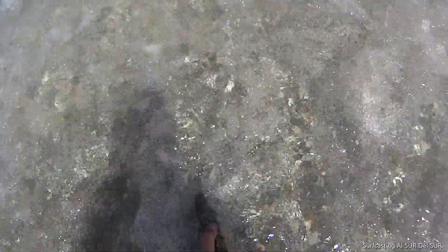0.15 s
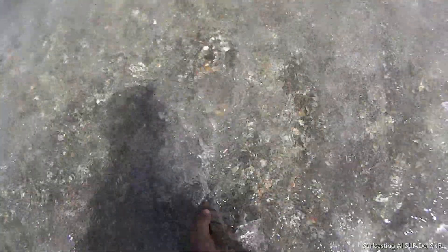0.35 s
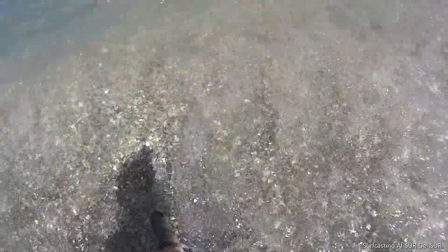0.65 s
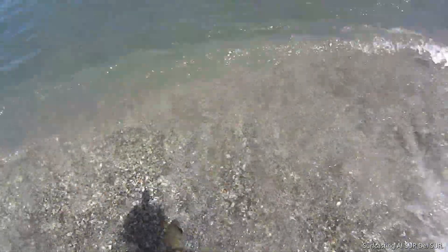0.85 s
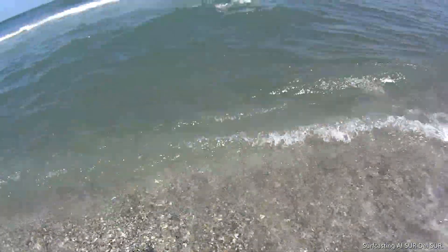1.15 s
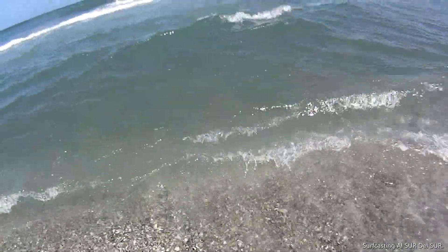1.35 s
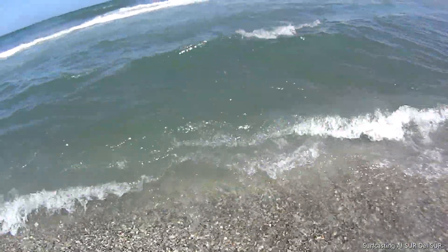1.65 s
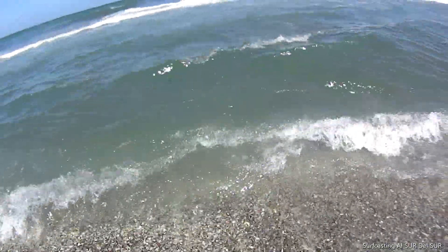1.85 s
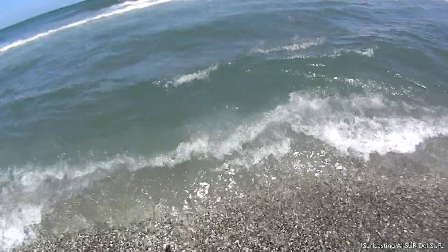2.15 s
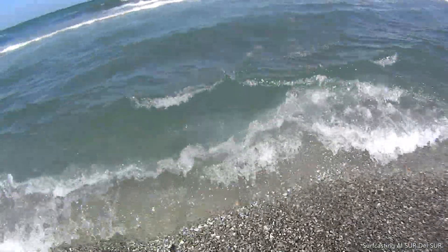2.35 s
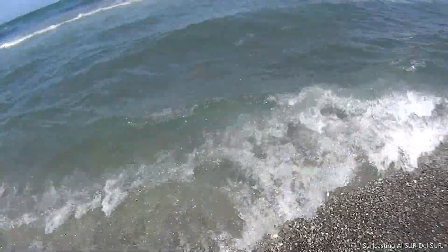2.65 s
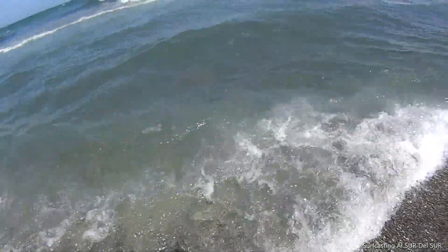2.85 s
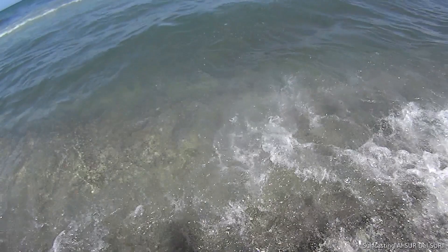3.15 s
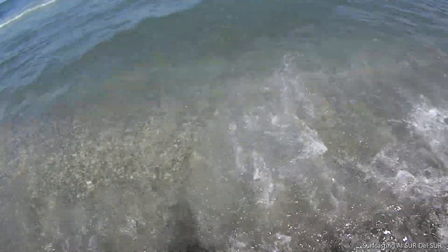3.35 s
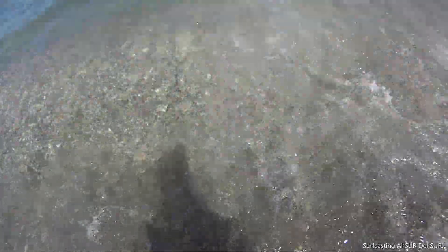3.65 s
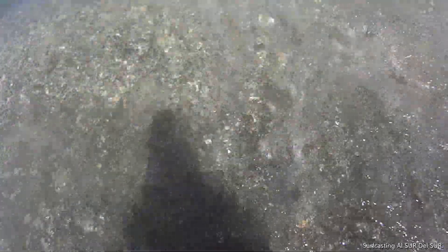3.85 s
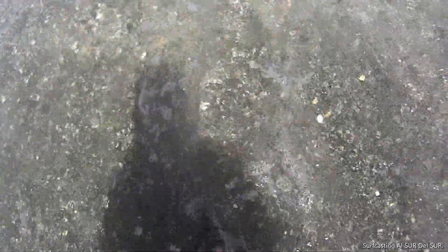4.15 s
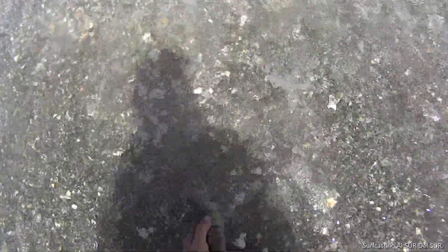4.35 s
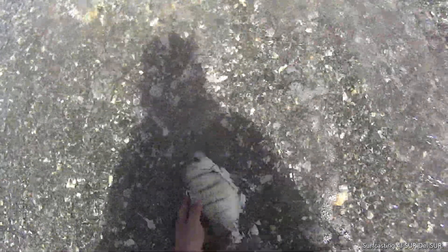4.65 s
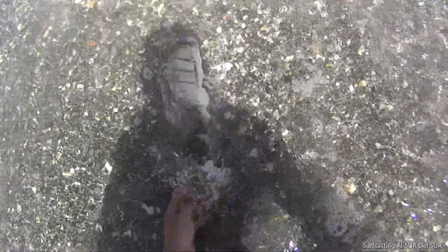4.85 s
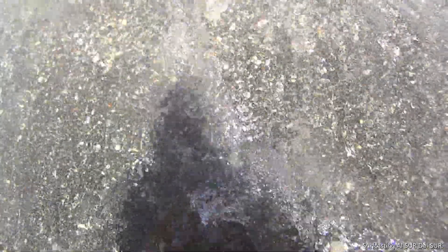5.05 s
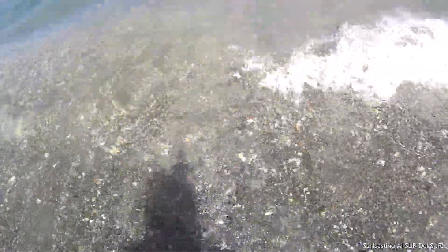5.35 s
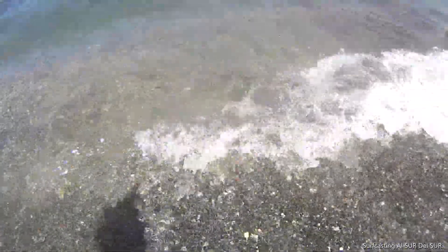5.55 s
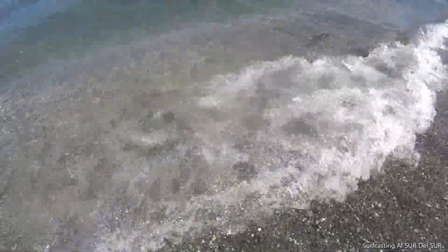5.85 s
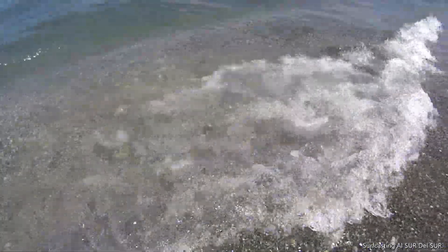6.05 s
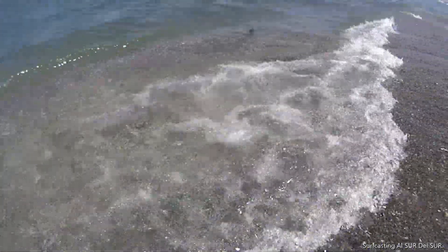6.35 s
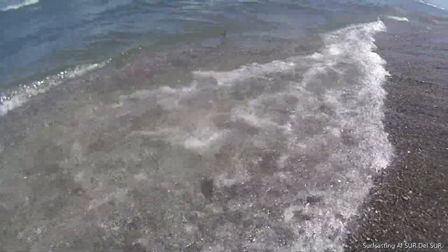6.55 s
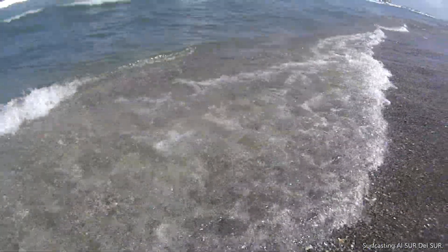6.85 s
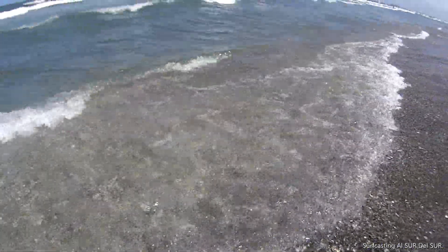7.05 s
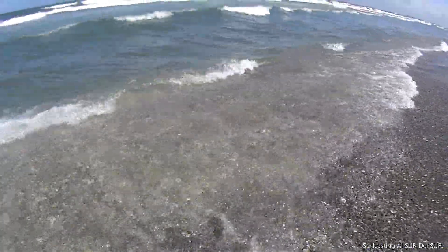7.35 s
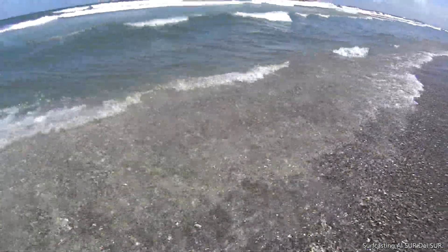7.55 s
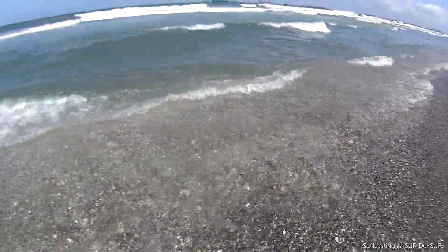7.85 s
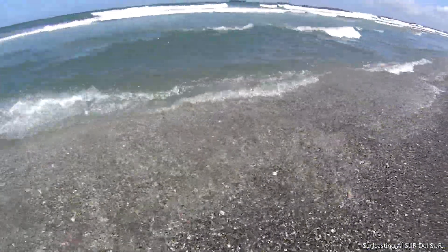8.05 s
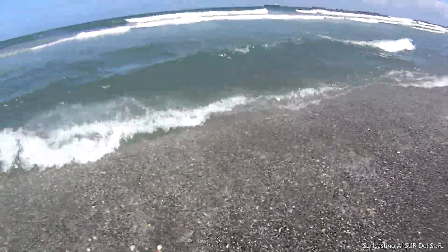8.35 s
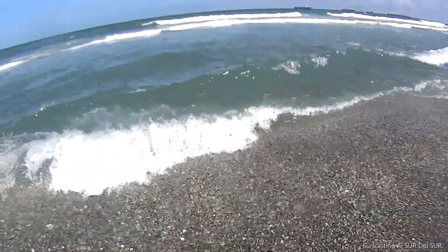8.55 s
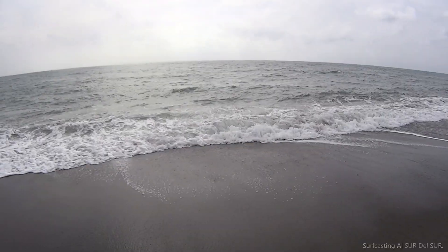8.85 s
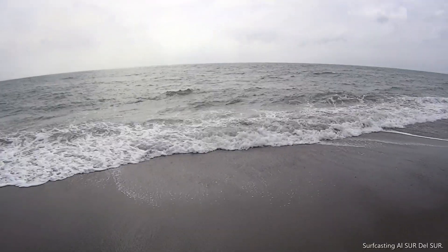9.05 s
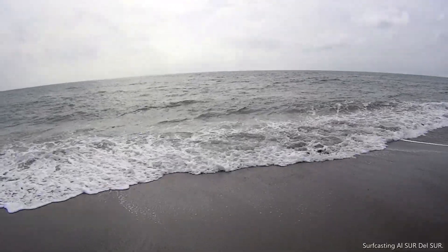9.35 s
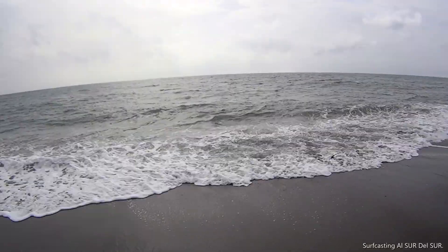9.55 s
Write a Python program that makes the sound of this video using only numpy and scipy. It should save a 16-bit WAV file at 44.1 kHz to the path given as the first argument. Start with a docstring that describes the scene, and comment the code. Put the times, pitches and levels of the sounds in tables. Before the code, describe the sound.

Close outdoor surf on pebbles, coloured by the hollow, nasal ring of a waterproof microphone case. At 0 s churning water is already draining, with a small slap and ping near 0.5 s. A wave builds from about 0.5 to 1.5 s, then a stronger breaker surges at 2.3-3 s, bright with rushing bubbles and foam, and drops away quickly. The water is calmer until 3.8 s, when close splashing starts: sharp wet slaps, droplets and tiny bubble pings, clustered again at 4.7-5.1 s. Another wave washes up around 5.3-5.9 s and the next drains slowly, with soft low plops or case knocks at 6-7 s. Further waves swell at 7.5 and 8.3 s. Deep gusts buffet faintly. Near 8.84 s everything fades out momentarily, then much softer, hollower surf on sand returns and ebbs to the end.

```python
"""Small waves break and wash up a pebble beach, heard from inside a hollow waterproof case.
From the start each wave builds, runs up and drains away: noise and ringing bubbles, split into bands.
Short slaps and bright pings add splashes close by, most of them from about 3.8 to 5.1 s; low plops or
knocks on the case, made as short fading tones, come mostly from 6 to 7 s. Gusts swell the deep bass.
Near 8.84 s the sound fades out for an instant and returns as softer, hollower surf on sand.
"""
import sys
import numpy as np
from scipy import signal
from scipy.fft import rfft, irfft
from scipy.io import wavfile

SR = 44100
rng = np.random.default_rng(int(sys.argv[2]) if len(sys.argv) > 2 else 0)


def transcribe(u):
    """Save the signal u as a 16-bit wav file named by the first command-line argument.

    u: samples, shape (n,) or (channels, n), limited to [-1, 1]; the rate is SR.
    q: integer samples, one column per channel.
    """
    v = np.clip(np.atleast_2d(u).T, -1, 1)
    q = np.round(v * 32767).astype(np.int16)
    wavfile.write(sys.argv[1], SR, q)


N = 428642  # length in samples
T = np.arange(N) / SR  # time of each sample, s
HZ = np.fft.rfftfreq(N, 1 / SR)  # pitch of each step of a spectrum


# the side from which the rush and fizz come: (time [s], left minus right [dB])
RUSH_SIDE = [(0.2, -0.5), (.75, 0.5), (2.2, 1), (2.75, 0.1), (3.25, -2.1), (3.75, -.3), (4.25, -1.4),
             (4.75, -.6), (5.25, -1.2), (6.3, 0.7), (8.8, 1), (8.9, -1)]


def surf():
    """Moving water sounds in bands, from deep slosh to fizzing foam, each with its own changing level."""
    (slosh_db, churn_db, rush_db, fizz_db), spray = shore()
    buffet_db, rumble_db = wind()
    water = through_case(water_source(spray))

    slosh = voiced(water, 150, 790) * gain_of(slosh_db + 0.84 * drift(12))
    # a big breaker traps big pockets of air, so it swells most in the bass
    surge_db = np.maximum(slosh_db - np.median(slosh_db), 0)
    boom_noise = through_case(rng.standard_normal((2, N)))
    boom = voiced(boom_noise, 200, 400) * gain_of(slosh_db - 3) * (1 - gain_of(-2 * surge_db))
    churn = voiced(water, 870, 1864) * gain_of(churn_db + 0.64 * drift(20))

    # water tumbles in clumps, the more so the closer it splashes
    clumps_db = (0.26 + 1.5 * spray) * drift(35)
    rush = voiced(water, 2260, 5780) * gain_of(rush_db + clumps_db)
    foam = water * band(6600, 20000)
    fizz = voiced(foam, 6900, 10100) * gain_of(fizz_db + clumps_db + 0.48 * drift(25))

    buffet = voiced(water, 12, 33) * gain_of(buffet_db + 1.5 * drift(5))
    rumble = voiced(water, 54, 134) * gain_of(rumble_db + 1.0 * drift(6.2))

    side_db, = follow(RUSH_SIDE)
    left_right = gain_of([side_db / 2, -side_db / 2])
    return slosh + boom + churn + buffet + rumble + (rush + fizz) * left_right


# each wave builds, runs up the shingle and drains away: (start [s], rise [s], hold [s],
# fall before FALL_RATIO [dB per s], slosh of the water mass [dB], churning water [dB],
# rush of bubbles and stones [dB], fizz of foam [dB])
WAVES = [(-.42, .25, 0.5, 11.5, -53, -38.5, -33.5, -45), (0.427, 1.08, .86, 5.5, -51.5, -44.5, -30, -40.5),
         (2.244, 0.38, 0.32, 22, -48.5, -36, -25.5, -33),
         (2.763, 0.082, 0.018, 78.5, -56, -33.5, -26.5, -38), (4.94, 0.37, 0.56, 31, -51, -43, -30, -40),
         (5.96, 0.14, 0.62, 4.7, -53.5, -40, -28.5, -38.5), (7.18, 0.55, 0.31, 17, -65, -42.5, -32, -41.5),
         (8.02, 0.38, 0.33, 24, -51.5, -43.5, -26.5, -33.3), (8.6, 0.14, .05, 20, -52, -48, -28.5, -38)]
# bouts of splashing in the shallows close by:
# (start [s], hold after the rise [s], slosh [dB], churn [dB], rush [dB], fizz [dB])
SPLASHING = [(.48, .04, -60, -45, -41, -43), (3.876, 0.36, -54.5, -39, -33, -40),
             (4.097, 0.044, -52, -42, -34, -44), (4.78, 0.32, -53, -38, -32.5, -41.5)]
# the sea between waves: (slosh [dB], churn [dB], rush [dB], fizz [dB])
SEA_DB = (-53, -41.5, -40.5, -50)
# a wave running out on sand: (time [s], slosh [dB], churn [dB], rush [dB], fizz [dB])
SAND = [(8.87, -51.5, -50, -41.5, -50), (9.25, -55, -48.5, -44, -50.5), (9.7, -58, -56.5, -48, -54)]


def shore(splash_rise_s=0.014, splash_fall_db_per_s=126, wave_spray=0.057, near_spray=0.32):
    """Powers of sea, waves and splashing add up until sand takes over: band levels in dB, share of spray."""
    waves = sum(surge(start, rise, hold, fall, levels)
                for start, rise, hold, fall, *levels in WAVES)
    near = sum(surge(start, splash_rise_s, hold, splash_fall_db_per_s, levels)
               for start, hold, *levels in SPLASHING)
    power = gain_of(SEA_DB)[:, None] ** 2 + waves + near

    # spray is the share of the power that is separate drops (0-1)
    near_share = near.sum(0) / power.sum(0)
    spray = wave_spray + (near_spray - wave_spray) * near_share
    levels_db = np.where(T < SAND[0][0], 10 * np.log10(power), follow(SAND))
    return levels_db, np.clip(spray, 0, 1)


# how fast each band falls; the churning lingers, the foam dies first:
# (slosh [times], churn [times], rush [times], fizz [times])
FALL_RATIO = (0.74, 0.66, 0.98, 1.33)


def surge(start, rise_s, hold_s, fall_db_per_s, levels_db):
    """Power of slosh, churn, rush and fizz for moving water that builds, holds and dies away."""
    age = T - start
    rise = np.clip(age / rise_s, 0, 1) ** 2
    fallen_db = fall_db_per_s * np.maximum(age - rise_s - hold_s, 0)
    level_db = np.array(levels_db)[:, None] - np.outer(FALL_RATIO, fallen_db)
    return rise * gain_of(level_db) ** 2


# the hollower colour of surf on sand: (pitch [Hz], level [dB])
HOLLOW = [(200, 1), (700, -3.5), (1150, 1.5), (1400, 0.5), (1620, 3), (1870, -0.5), (2200, 5.5), (2950, 4),
          (3400, 2.5), (4400, 3.5), (5200, 3.5), (8000, 1)]


def water_source(spray):
    """A wash of countless far bubbles is noise, with nearer bubbles and spray standing out of it."""
    nearer = bubbles(per_s=5000, spread_db=3.0, cycles=12.1, low_hz=901.3, high_hz=9995, count=60)
    wash = evened(rng.standard_normal((2, N)) + gain_of(-5.0) * nearer)
    drops = bubbles(per_s=1800, spread_db=3.5, cycles=4, low_hz=2190, high_hz=10020)
    source = np.sqrt(1 - spray) * wash + np.sqrt(spray) * drops
    on_sand = irfft(rfft(source) * gain_of(read(HOLLOW)), N)
    return np.where(T < SAND[0][0], source, on_sand)


def bubbles(per_s, spread_db, cycles, low_hz, high_hz, count=24):
    """Bubbles of many sizes each ring a few cycles, rising in pitch; most are faint, a few loud."""
    out = np.zeros((2, N))
    t = np.arange(SR // 50) / SR
    bubbles_per_size = int(per_s * T[-1] / count)
    for hz in np.geomspace(low_hz, high_hz, count):
        age = hz * t / cycles
        rising = 1 + 0.0297 * np.minimum(age, 4)
        ring = np.exp(-age) * np.sin(2 * np.pi * hz * t * rising)
        draws = rng.random((2, 2, 8192))[..., :bubbles_per_size]
        for channel, (when, luck) in zip(out, draws):
            loudness = gain_of(spread_db * np.minimum(-np.log(1 - luck), 4.5))
            strikes = np.bincount((when * N).astype(int), loudness, N)
            channel += hz * signal.oaconvolve(strikes, ring)[:N]
    return evened(out)


# the loudest single splashes and stone ticks: (time [s], body level [dB], treble level [dB])
SPLASHES = [(0.08, -19, -37), (0.4978, -28, -33), (3.8244, -26, -45), (3.892, -30, -30), (3.931, -30, -25),
            (4.0205, -21, -35), (4.1686, -29, -46), (4.2289, -31, -28), (4.6305, -44, -41),
            (4.747, -23, -49), (4.79, -25, -28), (4.8051, -25, -36), (4.813, -28, -26), (4.837, -28, -22),
            (4.874, -18, -44), (4.9266, -22, -47), (4.9457, -23, -44), (5.0272, -27, -35),
            (5.061, -31, -30), (5.0875, -27, -42), (6.4093, -20, -45), (7.808, -23, -47),
            (8.1578, -25, -29)]


def splashes(slap_peak_s=0.0008, patter_db=-19, patter_s=0.0073):
    """Each splash is a sharp slap, then a faint patter of droplets, shaped from noise through the case."""
    t = np.arange(SR // 25) / SR
    age = t / slap_peak_s
    slap = age * np.exp(1 - age)
    patter = gain_of(patter_db) * np.exp(-t / patter_s) * (1 - np.exp(-age))
    shape = slap + patter

    water = through_case(rng.standard_normal((2, N)))
    body, treble = voiced(water, 2500, 5000), voiced(water, 7200, 12000)
    out = np.zeros((2, N))
    for s, body_db, treble_db in SPLASHES:
        for layer, db in ((body, body_db), (treble, treble_db)):
            burst = layer[:, round(s * SR):][:, :len(t)] * shape
            # even out the chance strength of this bit of noise
            even = np.linalg.norm(shape) / np.linalg.norm(burst.mean(0))
            add(out, s, gain_of(db) * burst * even)
    return out


# single bubbles with bright pings, and low plops or knocks on the case:
# (time [s], pitch [Hz], level before the decay and soft start [dB], time to fall by 60 dB [s])
PINGS_AND_PLOPS = [(.495, 3150, -21, .02), (.92, 60, -43, .2), (4.170, 2420, -22, .02),
                   (4.804, 342, -29.5, 0.063), (4.805, 1164, -23, .04), (4.805, 716, -30, 0.024),
                   (5.206, 5300, -20, .03), (6.04, 177, -41, .24), (6.709, 148, -41, 0.14),
                   (6.72, 80, -44, .25), (6.82, 246, -37, 0.21), (6.83, 70, -40, .3)]


def pings_and_plops():
    """Each ping, plop or knock is one steady tone that starts softly and soon dies away."""
    out = np.zeros(N)
    t = np.arange(SR // 3) / SR
    for s, hz, db, fall_60db_s in PINGS_AND_PLOPS:
        decay = gain_of(db - 60 * t / fall_60db_s)
        soft_start = 1 - np.exp(-hz * t)
        add(out, s, decay * soft_start * np.sin(2 * np.pi * hz * t))
    return out


# gusts on the case: (time of peak [s], half width at half power [s], deep buffeting [dB], rumble [dB])
GUSTS = [(2.0, 0.18, -60, -68), (2.98, 0.13, -55, -66), (3.45, .15, -60, -78), (5.0, .3, -65, -66),
         (6.95, 0.34, -64, -60), (7.75, .3, -63, -64), (9.1, 0.18, -57, -62)]
# the light breeze between gusts: (buffeting [dB], rumble [dB])
BREEZE_DB = (-68, -63)


def wind():
    """Gusts swell and ebb over a light breeze, adding in power: levels of buffeting and rumble in dB."""
    gusts = sum(np.outer(gain_of(levels) ** 2, .5 ** (((T - s) / width) ** 2))
                for s, width, *levels in GUSTS)
    return 10 * np.log10(gain_of(BREEZE_DB)[:, None] ** 2 + gusts)


# broad colour of the water through the case: (pitch [Hz], level [dB])
COLOUR = [(25, -3), (100, -7.5), (250, 1.5), (500, 2), (760, -0.5), (950, 3), (1700, 2.5), (1980, 2),
          (2550, 6.5), (3000, 9.5), (4200, 11.5), (5850, 6.5), (7500, 3.5), (9000, -1), (11000, -7.5)]
# resonances of the case: (pitch [Hz], width at half the dB [Hz], height [dB])
CASE = [(1275, 240, 7.5), (1395.5, 123, 9.5), (1628, 155, 3.5), (2290, 230, 2), (3188, 650, 6),
        (3685, 490, 2), (5180, 920, 5.5), (6310, 360, 3), (7350, 560, 1.5)]
# how alike the two microphone ports hear the water: (pitch [Hz], likeness [0-1])
LIKENESS = [(30, .91), (100, .85), (250, .8), (650, .6), (950, .82), (1380, .97), (1950, .6), (2400, .8),
            (3200, .87), (5200, .9), (7700, .57), (11000, .65)]
# how far the left port leads the right: (pitch [Hz], lead [radians])
LEAD = [(40, 0.27), (300, -0.62), (600, -1.35), (1500, -1.44), (1680, -0.86), (1930, -1.62), (2600, -1.22),
        (3400, -0.75), (6000, -0.42), (8000, -0.27)]
# how much louder the left port is: (pitch [Hz], left minus right [dB])
TILT = [(400, -0.5), (1100, 0.5), (1400, -1), (1700, -3), (2000, -0.5), (3200, -4), (4300, -2),
        (6200, -3.5), (8000, -1)]


def through_case(pair):
    """A direct and a scattered sound ring the hollow case; returns the spectra at its two ports."""
    db = read(COLOUR)
    for hz, width, peak_db in CASE:
        db = db + peak_db * .5 ** ((2 * (HZ - hz) / width) ** 2)
    # minimum phase: the case rings only after it is struck
    cepstrum = irfft(np.log(gain_of(db)), N)
    cepstrum[1:N // 2] *= 2
    cepstrum[N // 2 + 1:] = 0
    direct, scattered = rfft(pair) * np.exp(rfft(cepstrum))

    same = np.clip(read(LIKENESS), 0, 1)
    common = np.sqrt(1 + same) * direct
    apart = np.sqrt(1 - same) * scattered
    side = gain_of(read(TILT) / 2) * np.exp(.5j * read(LEAD))
    return np.array([(common + apart) * side, (common - apart) / side])


def voiced(spectra, low_hz, high_hz):
    """One band of the water in stereo, scaled so that the mean of left and right has an rms of one."""
    x = irfft(spectra * band(low_hz, high_hz), N)
    return x / np.std(x.mean(0))


def band(low_hz, high_hz, order=8):
    """Gain of a band of pitches with soft shoulders."""
    low_side = 1 + (low_hz / (HZ + 1)) ** order
    high_side = 1 + (HZ / high_hz) ** order
    return (low_side * high_side) ** -.5


def drift(rate_hz):
    """Slow random wander of rms one: straight lines between chance values, two per cycle of the rate."""
    knots = np.arange(0, T[-1] + 1, .5 / rate_hz)
    return evened(np.interp(T, knots, rng.standard_normal(len(knots))))


def gain_of(db):
    """Decibels to amplitude."""
    return 10 ** (np.asarray(db) / 20)


def evened(x):
    """Scales to an rms of one."""
    return x / np.sqrt(np.mean(x ** 2) + 1e-20)


def read(points):
    """A spectrum joined by straight lines over log frequency."""
    hz, value = np.transpose(points)
    return np.interp(np.log(HZ + 1), np.log(hz + 1), value)


def follow(rows):
    """The columns of a table over time, joined by straight lines, at every sample."""
    s, *columns = np.transpose(rows)
    return [np.interp(T, s, column) for column in columns]


def add(mix, s, sound):
    """Mixes a sound in at a time in seconds, cut off at the end of the mix."""
    part = mix[..., max(round(s * SR), 0):][..., :sound.shape[-1]]
    part += sound[..., :part.shape[-1]]


def scene():
    """The surf and wind, with the splashes, pings and plops."""
    return surf() + splashes() + pings_and_plops()


def record(dry, silent_s=8.838, fade_out_s=0.038, fade_in_s=0.052, edge_hz=11110):
    """A brief fade to silence between the pebbles and the sand; then a steep cut of the highest treble."""
    distance = np.maximum((silent_s - T) / fade_out_s, (T - silent_s) / fade_in_s)
    fade = np.clip(distance, 0, 1) ** 2
    lowpass = signal.firwin(801, edge_hz, window=("kaiser", 9), fs=SR)
    return signal.oaconvolve(dry * fade, lowpass[None], "same", axes=1)


dry = scene()
out = record(dry)
transcribe(out)
```